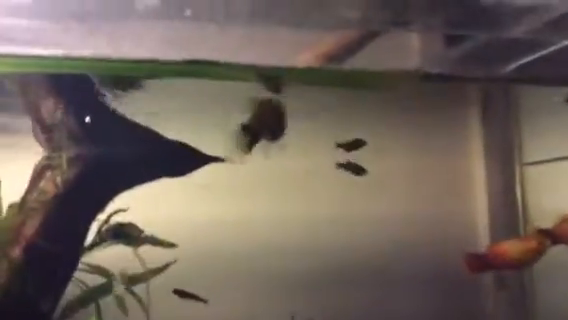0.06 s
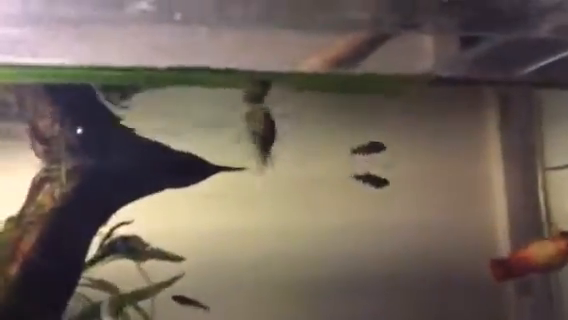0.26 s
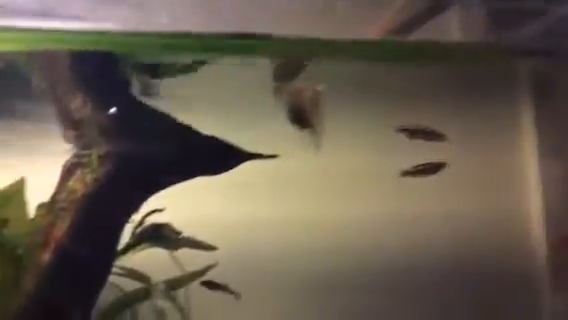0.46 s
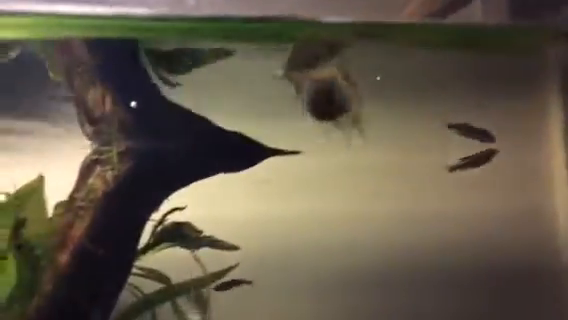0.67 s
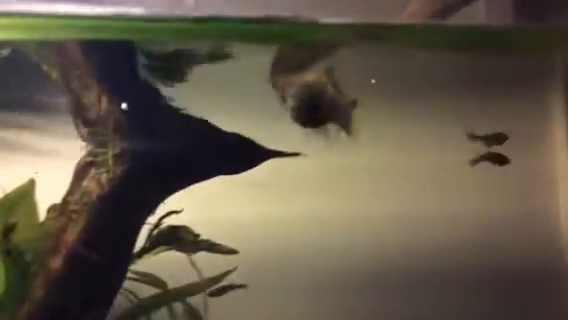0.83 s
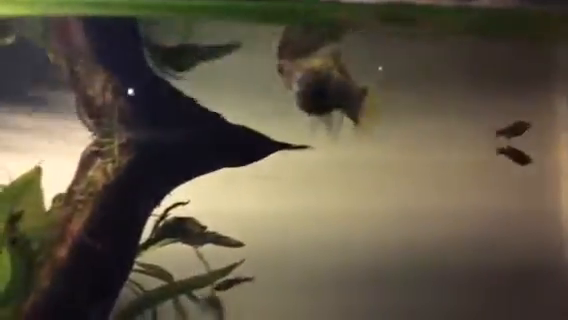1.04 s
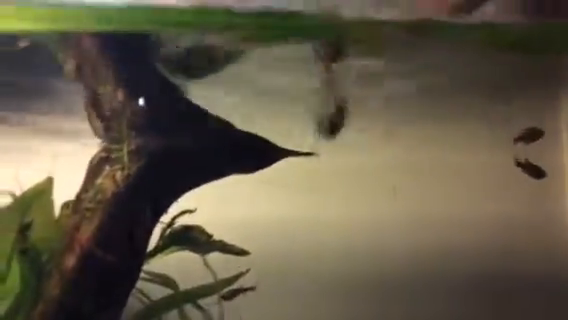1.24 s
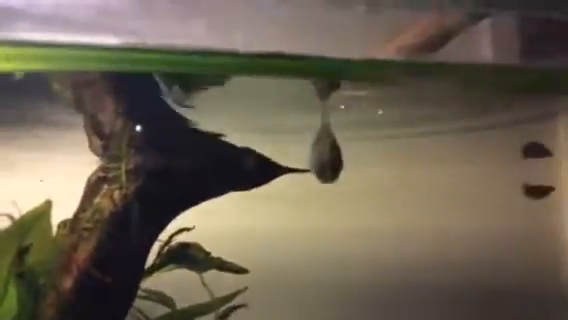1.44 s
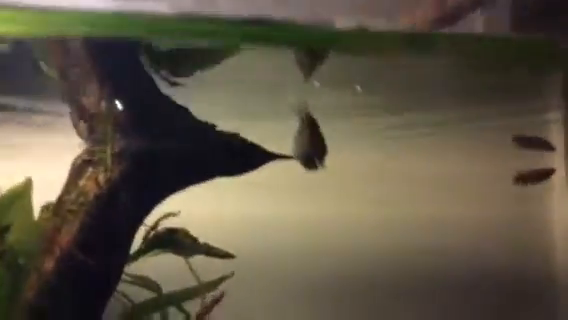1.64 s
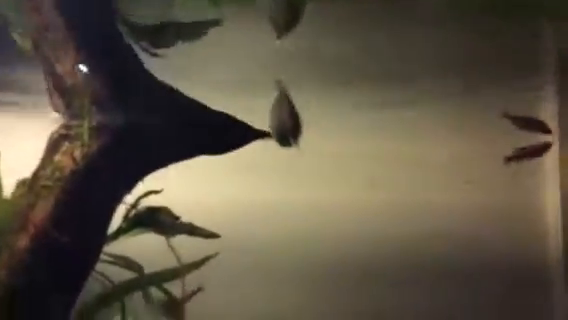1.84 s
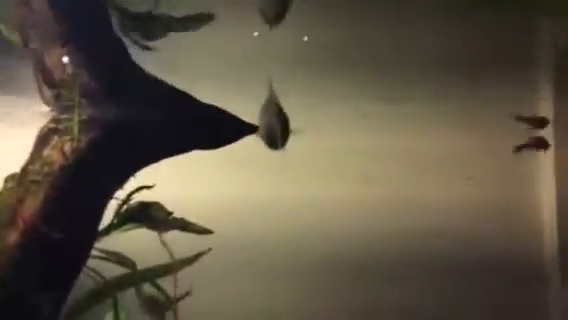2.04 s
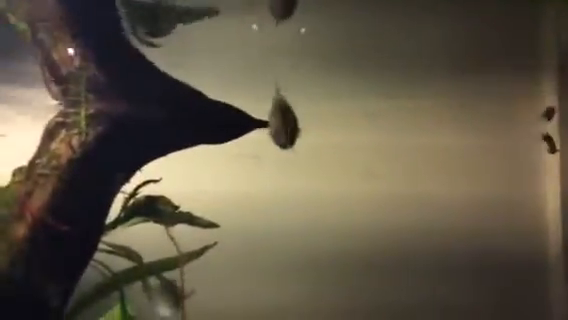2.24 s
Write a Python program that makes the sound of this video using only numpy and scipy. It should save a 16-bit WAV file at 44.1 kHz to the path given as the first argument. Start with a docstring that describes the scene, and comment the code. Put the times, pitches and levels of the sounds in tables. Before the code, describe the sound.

Something hard clacks twice in quick succession at about 0.2 seconds, some way off, ringing briefly in the room. Small bumps follow near 0.8 and 1.0 seconds, then a lighter clack at 1.3. A soft scrape comes around 1.7 seconds and a faint rustle near 2.2. Throughout, an aquarium pump hums low and steady under faint hiss and scattered tiny bubble pops.

```python
"""Something hard clacks twice some way off in a room with an aquarium; a lighter clack comes a second later.
Each impact excites a dense field of reflections, and the main knock leaves damped modes ringing.
Small bumps, soft scrapes and popping bubbles fall in between, each a decaying burst of coloured noise.
Underneath, the pump and the mains hum in steady tones below a faint hiss whose treble flickers."""
import sys
import numpy as np
from scipy import signal
from scipy.fft import rfft, irfft
from scipy.io import wavfile
from scipy.ndimage import uniform_filter1d

SR = 44100
rng = np.random.default_rng(int(sys.argv[2]) if len(sys.argv) > 2 else 0)


def transcribe(signal):
    """Save signal, clipped to [-1, 1], as a 16-bit WAV file at the path in sys.argv[1]."""
    frames = np.atleast_2d(signal).T
    limited = np.clip(frames, -1, 1)
    pcm = np.round(limited * 32767).astype(np.int16)
    wavfile.write(sys.argv[1], SR, pcm)


N = 101429

# Colours, or spectral envelopes. Each row: frequency in Hz, relative spectral density in dB.
CLICK = [(100, -39), (350, -25), (550, -4), (750, -0.5), (1150, 3), (1600, 0), (2300, -7), (2850, -14),
         (3650, 1), (4500, -11.5), (6000, -9.5), (9000, -17), (12000, -22.5), (15000, -36)]
KNOCK = [(25, -45), (70, -22), (150, -30), (260, -22), (420, 1.5), (780, 2), (1150, 0), (1400, -11.5),
         (2300, -10.5), (2850, -20.5), (3700, -8.5), (4500, -16), (5500, -15.5), (8600, -16), (9600, -22),
         (12000, -32), (15000, -42)]
REBOUND = [(100, -38), (240, -23), (340, -1.5), (480, 1), (700, -3.5), (1000, 3), (1400, -9.5),
           (2800, -17.5), (3900, -16.5), (5000, -30), (8500, -24), (15000, -40)]
LIGHT_CLICK = [(200, -34), (500, -16.5), (900, 3.5), (1500, -5.5), (2050, -16), (2600, -0.5), (3300, -4.5),
               (4500, -12.5), (7000, -12.5), (10000, -18.5), (15000, -31)]
LIGHT_KNOCK = [(200, -33), (440, -17), (600, -0.5), (1000, 2.5), (1200, 0), (1450, -11.5), (2050, -19),
               (2600, -14), (3800, -11.5), (6000, -21.5), (15000, -38)]
SNAP = [(100, -35), (400, -9), (800, 2), (1500, 0.5), (2800, -11), (3700, 2), (5000, -5.5), (7000, -3),
        (9000, 2), (11000, -15.5), (15000, -24)]
BUMP = [(30, -36), (70, -21), (180, -18), (270, -2.5), (340, -14), (520, -11.5), (750, -17), (1300, -22),
        (2200, -26), (3500, -31.5), (6000, -41), (15000, -38)]
THUD = [(25, -25), (60, -4), (130, 14.5), (300, -11.5), (700, -12.5), (1200, -38), (15000, -60)]
TICK = [(200, -25), (1000, -3), (2000, -12), (4500, -13), (6200, -8), (7800, -3.5), (10000, -4),
        (12500, -6), (15000, -6)]
SCRAPE = [(200, -24), (700, -2.5), (1300, -5.5), (1750, 4), (1980, 7), (2250, -10), (3100, -3.5), (3900, 0),
          (4300, -9.5), (5500, -3.5), (7000, -11.5), (15000, -26)]
RUSTLE = [(60, 10), (300, -6), (900, 3), (1800, -8), (3300, 4.5), (5000, -8), (8000, -1.5), (15000, -21)]
HISS = [(20, -26), (32, -11), (45, 3.5), (80, -1.5), (140, 5.5), (240, -2), (330, -1.5), (480, -7),
        (800, -9), (1500, -17.5), (2500, -18.5), (4000, -18.5), (8500, -20), (11000, -20.5), (15000, -22.5)]

# Hard impacts. Each row: start in seconds, level in dB, rise and hold in seconds,
# direct snap in dB relative to that level, colour.
IMPACTS = [(0.2054, -42.5, 0.0022, 0.064, 1, CLICK), (.2440, -38.5, 0.00093, 0.047, 1, KNOCK),
           (.3130, -41, 0.0054, 0.017, -7, REBOUND), (1.297, -52, 0.00085, 0.033, -0.5, LIGHT_CLICK),
           (1.308, -48.5, 0.0033, 0.024, -16, LIGHT_KNOCK)]
# Reverberation of the room. Each row: frequency in Hz, T60 (time to fall 60 dB) in seconds.
REVERB_TIMES = [(100, 0.48), (400, 0.32), (900, 0.36), (2000, 0.33), (4000, 0.3), (8000, 0.35),
                (14000, 0.3)]
# Ringing of the main knock. Each row: frequency in Hz, relative level in dB, T60 in seconds.
KNOCK_MODES = [(375.6, -9.5, 0.46), (440, -6, 0.26), (481.2, 4.5, 0.3), (547, -6.5, 0.44), (613, -9, 0.29),
               (656, 0, 0.27), (768.3, 4, 0.24), (814, -10, 0.44), (887, 1.5, 0.27), (967, -10, .38),
               (1009, -4, .38), (1144, -1.5, 0.19), (3444, -11.5, 0.22), (3834, -10, 0.18)]
# Light touches just ahead of the clacks, small dry taps and soft scrapes.
# Each row: start in seconds, level in dB, rise in seconds, T60 in seconds, colour.
TOUCHES = [(0.195, -51, 0.0089, 0.12, CLICK), (1.290, -57.5, 0.0036, .06, LIGHT_CLICK)]
TAPS = [(.260, -51.5, 0.017, .14, THUD), (.795, -50.5, 0.0043, 0.19, BUMP),
        (1.049, -48.5, .004, 0.06, THUD), (.671, -60, .001, 0.25, TICK), (.700, -66, 0.0099, 0.27, CLICK),
        (.720, -67.5, .003, 0.22, TICK), (.966, -68, 0.013, 0.2, TICK), (1.120, -70.5, .003, 0.11, TICK),
        (1.510, -65, .004, 0.27, TICK), (1.580, -64.5, 0.0043, 0.24, TICK), (2.199, -67, .001, 0.13, TICK)]
SCRAPES = [(1.672, -57.5, 0.042, 0.5, SCRAPE), (2.245, -63.5, 0.03, .8, RUSTLE)]
# Thin ringing of the first scrape. Each row: frequency in Hz, level in dB, T60 in seconds.
SCRAPE_MODES = [(1925, -67, 0.53), (2000, -71, 0.7), (3840, -71, .35), (5160, -74, 0.48)]
# Bubbles popping in the tank. Each row: start in seconds, pitch in Hz, level in dB.
BUBBLES = [(.090, 9500, -68.5), (.115, 2900, -73), (.487, 5900, -74), (.520, 9600, -69.5),
           (.540, 7870, -70.5), (0.634, 2860, -71.5), (.895, 9600, -71.5), (.975, 3330, -72),
           (.990, 7700, -70), (1.020, 4970, -73.5), (1.119, 8300, -68.5), (1.235, 3890, -70),
           (1.460, 8100, -70.5), (1.495, 6000, -73), (1.512, 8700, -66), (1.580, 2860, -69.5),
           (1.895, 9700, -68), (1.935, 10000, -70), (2.010, 3720, -70.5), (2.199, 6180, -66.5)]
# Partials of the pump and the mains. Each row: frequency in Hz, RMS level in dB.
HUM_PARTIALS = [(100.1, -62), (166.5, -56), (200.3, -79), (300.7, -78), (333, -76), (400.4, -101.5),
                (500, -87), (665, -96.5)]


def impact(level_db, rise, hold, snap_db, colour, snap_peak_s=0.0013):
    """Direct sound and reverberation: a bright snap, then each band of the room decays at its own rate."""
    t, hz = np.arange(SR) / SR, np.fft.rfftfreq(SR, 1 / SR)
    spectrum, reverb = rfft(reflections(colour)), np.zeros(SR)
    centres_hz, t60s = np.transpose(REVERB_TIMES)
    for t60, weights in zip(t60s, np.eye(len(t60s))):
        band = log_interp(zip(centres_hz, weights), hz)  # overlapping bands that sum to one
        reverb += irfft(spectrum * band, SR) * envelope(rise, hold, t60)
    pulse = t / snap_peak_s * np.exp(1 - t / snap_peak_s)
    snap = amp(snap_db) * reflections(SNAP) * pulse
    return amp(level_db) * (reverb + snap)


def reflections(colour, clump_db=2, clump_s=0.0013):
    """A diffuse field: echoes arrive so densely that they merge into one second of clumped noise."""
    noise = rng.standard_normal(SR)
    return tint(noise * amp(clump_db * drift(SR, 1 / clump_s)), colour)


def ringing(modes, rise, hold):
    """Free vibration: a sum of normal modes, each a sinusoid with its own damping."""
    t = np.arange(SR) / SR
    return sum(amp(db) * envelope(rise, hold, t60) * np.sin(2 * np.pi * (hz * t + rng.random()))
               for hz, db, t60 in modes)


def light_contact(level_db, rise, t60, colour):
    """Broadband excitation: a touch, tap or scrape gives noise that swells and at once decays."""
    return amp(level_db) * reflections(colour) * envelope(rise, rise, t60)


def bubble(pitch_hz, level_db, relative_half_width=0.075):
    """Resonance: a bubble's brief ping, smeared by the room into a narrow band of noise."""
    hz = np.fft.rfftfreq(SR, 1 / SR)
    resonance = 1 / (1 + ((hz / pitch_hz - 1) / relative_half_width) ** 2)
    ping = irfft(rfft(rng.standard_normal(SR)) * resonance, SR)
    return amp(level_db) * unit_rms(ping) * envelope(rise=0.003, hold=0.007, t60=0.16)


def hum(waver_db=0.66, waver_hz=3.5):
    """Periodic vibration: the pump and the mains give a line spectrum, each partial wavering in level."""
    t = np.arange(N) / SR
    tones = np.zeros(N)
    for hz, db in HUM_PARTIALS:
        peak = np.sqrt(2) * amp(db + waver_db * drift(N, waver_hz))
        tones += peak * np.sin(2 * np.pi * (hz * t + rng.random()))
    return tones


def hiss(level_db=-66.5, flicker_db=2.5, corner_hz=2200):
    """Random amplitude modulation: the treble of the room noise flickers in time-frequency patches."""
    hz = np.fft.rfftfreq(512, 1 / SR)
    real, imag, patches = rng.standard_normal((3, N // 128 + 5, len(hz)))
    for _ in range(2):
        patches = uniform_filter1d(patches, size=9, axis=0)  # over time
        patches = uniform_filter1d(patches, size=8, axis=1)  # over frequency
    depth_db = flicker_db * hz ** 2 / (hz ** 2 + corner_hz ** 2)
    spectra = (real + 1j * imag) * amp(depth_db * unit_rms(patches))
    noise = signal.istft(spectra.T, nperseg=512, noverlap=384)[1][:N]
    return amp(level_db) * tint(noise, HISS)


def envelope(rise, hold, t60):
    """Exponential damping after a linear rise; the decay begins hold seconds from the onset."""
    t = np.arange(SR) / SR
    return np.minimum(t / rise, 1) * np.exp(-np.log(1000) * np.maximum(t - hold, 0) / t60)


def tint(noise, colour):
    """Linear filtering: imposes a spectral envelope on noise, at unit RMS."""
    hz = np.fft.rfftfreq(len(noise), 1 / SR)
    return unit_rms(irfft(rfft(noise) * amp(log_interp(colour, hz)), len(noise)))


def drift(size, rate_hz):
    """Low-passed noise: a smooth random fluctuation at unit RMS."""
    hz = np.fft.rfftfreq(size, 1 / SR)
    return unit_rms(irfft(rfft(rng.standard_normal(size)) * np.exp(-(hz / rate_hz) ** 2), size))


def log_interp(points, hz):
    """Interpolation on a logarithmic frequency axis."""
    points_hz, values = np.transpose(list(points))
    return np.interp(np.log(hz + 1), np.log(points_hz + 1), values)


def amp(db):
    """The decibel law: 20 dB is a tenfold amplitude."""
    return 10 ** (np.asarray(db) / 20)


def unit_rms(x):
    """Normalisation to unit mean power."""
    return x / np.sqrt(np.mean(x ** 2) + 1e-20)


def add(mix, start, sound):
    """Superposition: a sound joins the mix at its start in seconds."""
    part = mix[round(start * SR):][:len(sound)]
    part += sound[:len(part)]


def scene():
    """Sound pressures add: impacts, light contacts and bubbles over the hum and hiss, in mono."""
    mix = hum() + hiss()
    for start, *row in IMPACTS:
        add(mix, start, impact(*row))
    add(mix, start=0.242, sound=amp(-46) * ringing(KNOCK_MODES, rise=0.005, hold=0.044))
    for start, *row in TAPS + SCRAPES + TOUCHES:
        add(mix, start, light_contact(*row))
    add(mix, start=1.685, sound=ringing(SCRAPE_MODES, rise=0.038, hold=0.038))
    for start, *row in BUBBLES:
        add(mix, start, bubble(*row))
    return mix[None]


def record(dry):
    """Band limiting: a linear-phase low-pass filter removes the highest treble."""
    cutoff_hz = 15400
    lowpass = signal.firwin(511, cutoff_hz, window=("kaiser", 9), fs=SR)
    return signal.oaconvolve(dry, lowpass[None], "same")


dry = scene()
out = record(dry)
transcribe(out)
```